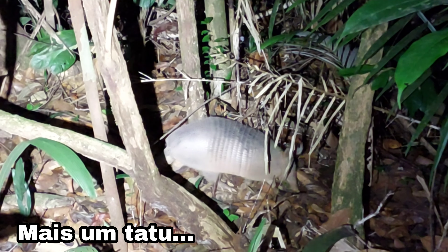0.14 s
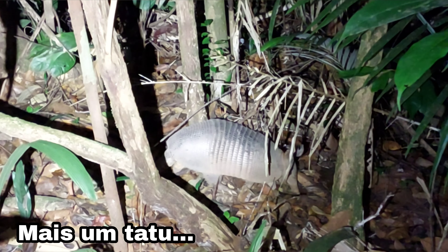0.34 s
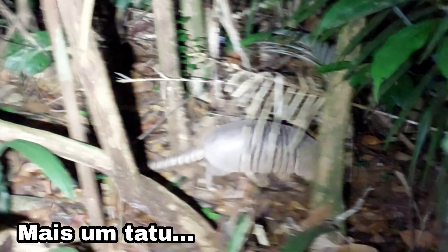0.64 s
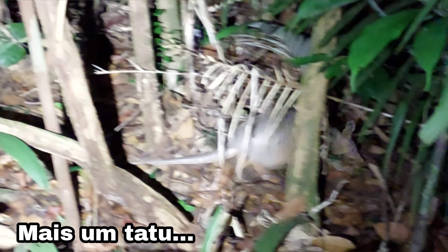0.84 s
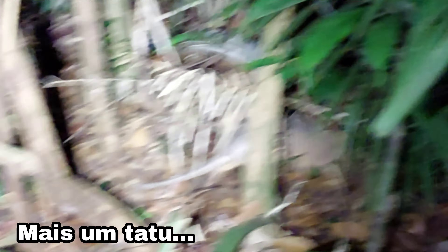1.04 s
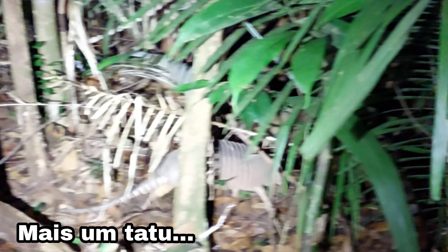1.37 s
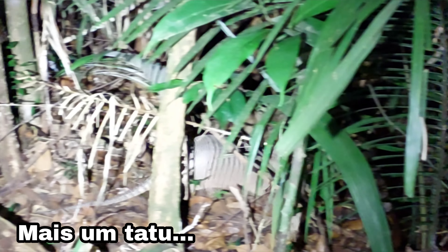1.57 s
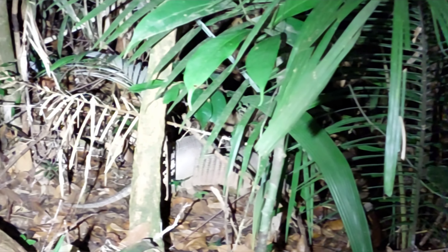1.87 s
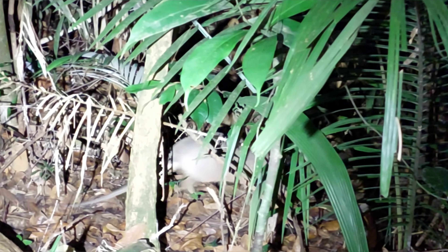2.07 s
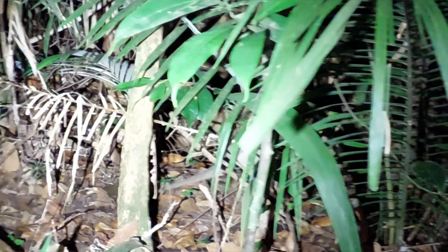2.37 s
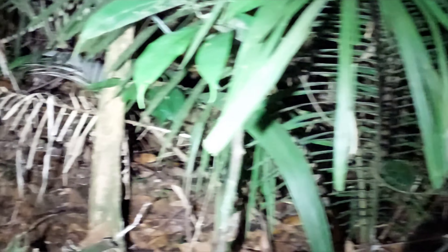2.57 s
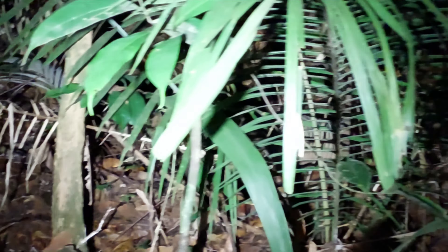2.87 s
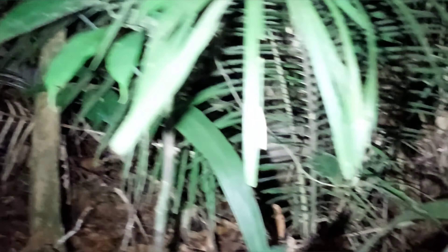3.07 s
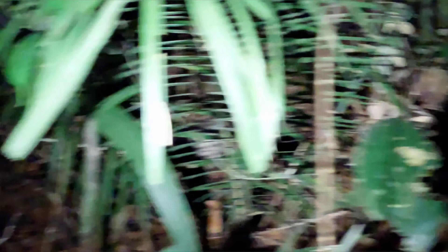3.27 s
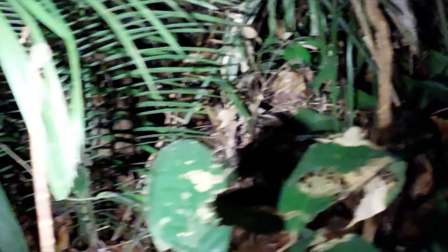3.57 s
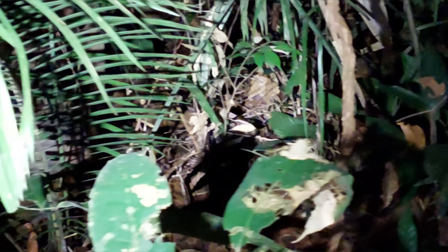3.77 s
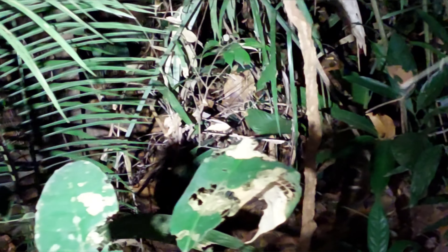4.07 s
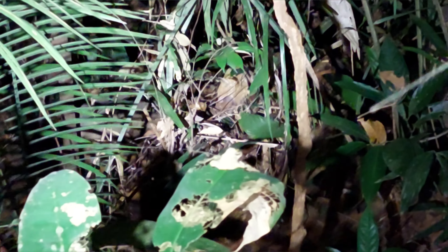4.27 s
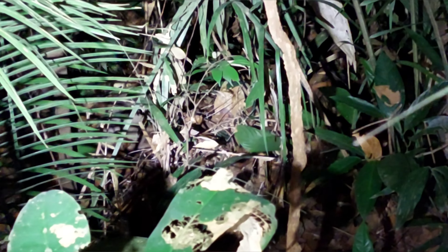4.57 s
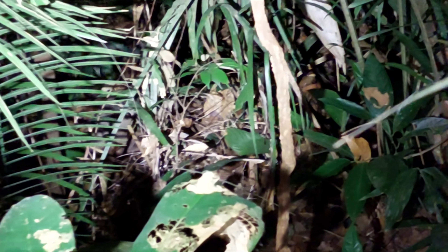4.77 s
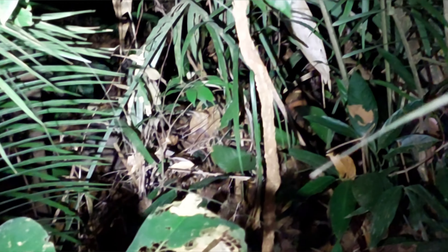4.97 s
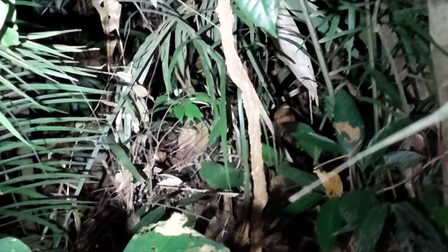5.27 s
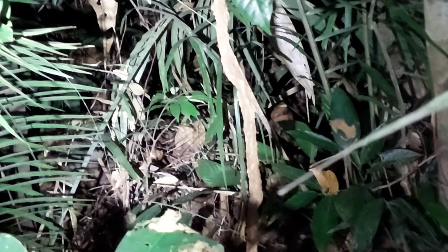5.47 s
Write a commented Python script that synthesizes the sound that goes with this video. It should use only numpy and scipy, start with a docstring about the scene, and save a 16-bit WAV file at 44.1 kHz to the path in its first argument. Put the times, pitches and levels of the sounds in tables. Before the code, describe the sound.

High pulsing insects hiss steadily over a faint low rumble as a small animal rustles through leaf litter and distant frogs call.

```python
"""Night in a rainforest, heard by a hand-held phone. From the start, far insects hiss over a low rumble and hum,
both shaped from noise or steady tones, while crickets, katydids and cicadas sing in pulsed tones and leaves
crackle in bursts of rough noise with snapping twigs. Soon a frog whoops in rising glides, again and again;
thin squeaks bend in pitch past the middle and a smaller frog answers. Then a near cricket chirps evenly in short
notes, a few pips fall away, the loudest twig snaps, and near the end a hoarse croak pulses through a throat."""
import sys
import numpy as np
from scipy import signal
from scipy.fft import rfft, irfft
from scipy.io import wavfile
from scipy.ndimage import uniform_filter1d

SR = 44100
rng = np.random.default_rng(int(sys.argv[2]) if len(sys.argv) > 2 else 0)


def wav_out(sig):
    """Save sig, one row per channel (or a flat mono array), as 16-bit PCM at SR to the path in sys.argv[1]."""
    wavfile.write(sys.argv[1], SR, np.round(np.clip(np.atleast_2d(sig).T, -1, 1) * 32767).astype(np.int16))


N = 248283
TIME = np.arange(N) / SR
SIDES = np.array([[1], [-1]])  # left, right


def undb(db):
    """Turn decibels into a plain gain."""
    return 10 ** (np.asarray(db) / 20)


def unit(x):
    """Scale a signal to an RMS level of 1."""
    return x / np.sqrt(np.mean(np.abs(x) ** 2))


def read(table, outside=None):
    """Columns of a table joined by straight lines in time."""
    s, *columns = np.transpose(table)
    return [np.interp(TIME, s, c, outside, outside) for c in columns]


def walk(rate):
    """A random wander: levels held for 1 / rate s, smoothed twice; spread near 1."""
    k = int(SR / rate)
    steps = np.repeat(rng.standard_normal(N // k + 1), k)
    smooth = uniform_filter1d(uniform_filter1d(steps, k), k)
    return unit(smooth[:N])


def over_hz(points):
    """A table of values against pitch, read at every frequency bin."""
    hz, value = np.transpose(points)
    return np.interp(np.log(np.fft.rfftfreq(N, 1 / SR) + 1), np.log(hz), value)


def phrase(start, end, db, edge_s=0.046):
    """A gain that opens and shuts softly."""
    return undb(db) * np.clip(np.minimum(TIME - start, end - TIME) / edge_s + .5, 0, 1)


# How alike noise is on the two sides: f/Hz, likeness (-1 to 1)
LIKENESS = [(60, 0.52), (130, 0.4), (500, 0.22), (1400, 0.32), (3100, 0.22), (6000, -0.033)]
# How noise leans to one side: f/Hz, left minus right level/dB
BALANCE_DB = [(100, 7), (380, 2), (4400, 0.5), (8100, 5.5), (10000, -3.5), (15000, -4)]


def stereo_noise(colour, mid=None, side=None):
    """Coloured noise on two ports, alike and tilted between them as the pitch decides; mid level 1."""
    like = np.clip(over_hz(LIKENESS), -.9, .9)
    mid = rng.standard_normal(N) if mid is None else mid
    side = rng.standard_normal(N) if side is None else side
    gain = undb(over_hz(colour))
    mid = rfft(mid) * gain * np.sqrt(1 + like)
    side = rfft(side) * gain * np.sqrt(1 - like)
    both = irfft((mid + SIDES * side) * undb(SIDES * over_hz(BALANCE_DB) / 2), N)
    return both / np.std(both.mean(axis=0))


def tone(hz, gain, pan_db, fading=0.2, spread=1.0):
    """A tone reaches the two ports by many paths, which fade and shift it differently."""
    carrier = np.sqrt(2) * np.exp(2j * np.pi * np.cumsum(hz) / SR)
    mid = unit(1 + fading * (walk(14) + 1j * walk(13)))
    side = spread * unit(walk(7) + 1j * walk(6.4))
    return gain * (carrier * (mid + SIDES * side)).real * undb(SIDES * pan_db / 2)


def forest(x, t60_s, wet_db, spread=0.82):
    """Trunks and leaves scatter a call into a short tail; spread sets how differently the ports hear it."""
    s = np.arange(SR // 2) / SR
    decay = np.exp(-np.log(1000) * s / t60_s) * (s > .008)  # the tail waits 8 ms
    mid, side = rng.standard_normal((2, len(s))) * decay
    tail = (mid + SIDES * spread * side) / np.sqrt(np.sum(mid ** 2) * (1 + spread ** 2))
    return x + undb(wet_db) * signal.fftconvolve(x, tail, axes=1)[:, :N]


def blips(events, hz, rise_s, fall_s, pan_db):
    """Short notes with a quick rise and a longer fall."""
    shape = 0
    for s, db in events:
        age = np.clip(TIME - s, 0, 1)
        shape = shape + undb(db) * (1 - np.exp(-age / rise_s)) * np.exp(-age / fall_s)
    return tone(hz + 10 * walk(60), shape, pan_db, fading=0.034, spread=0.76)


# Colour of the far insects: f/Hz, relative level/dB
CHORUS = [(2600, -35.5), (3700, -15.5), (4300, -5.5), (4640, -9), (5000, -0.5), (5400, -4), (5850, -11.5),
          (6550, 0.5), (7060, -5), (8800, -3), (9610, -17.5), (9980, -42), (10800, -20.5), (15700, -18.5)]
# Colour of the rumbling air: f/Hz, relative level/dB
AIR = [(21, -29), (35, -10), (59, -1), (83, 0), (185, -13), (274, -10.5), (393, -14.5), (466, -15.5),
       (973, -29), (2030, -28), (2550, -35.5), (3200, -15.5), (4160, -33), (7040, -120)]
# Steady low hum tones: f/Hz, level/dB
HUM = [(57, -77.5), (84, -74.5), (545, -86.5)]
CHORUS_DB, AIR_DB = -49.5, -67  # average levels


def background():
    """Countless far insects blur into a swelling hiss; below it the air rumbles and a low hum wavers."""
    chorus = stereo_noise(CHORUS) * undb(CHORUS_DB + 0.41 * walk(1.9) + 0.85 * walk(8.3))
    air = stereo_noise(AIR) * undb(AIR_DB + 1.9 * walk(8))
    hum = sum(tone(hz + 2.54 * walk(2.9), undb(db), 8.3, fading=0.16, spread=0.57) for hz, db in HUM)
    return chorus + air + hum


def crackle(spread_db):
    """Noise whose grains differ widely in size."""
    return rng.standard_normal(N) * undb(spread_db * walk(400))


# Bursts of rustling: middle t/s, length/s, low crunch level/dB, mid crackle level/dB, fine hiss level/dB
RUSTLE = [(0.082, 0.14, -76, -62, -53), (0.516, 0.058, -77, -74, -63), (0.782, 0.093, -67.5, -70, -53),
          (0.968, 0.054, -70, -65, -63), (1.05, 0.093, -71, -66.5, -58.5), (1.666, 0.17, -72, -83, -59),
          (2.275, 0.13, -85, -67.5, -56.5), (2.47, 0.23, -86, -69, -73), (2.578, 0.02, -80, -56, -73),
          (2.646, 0.015, -81, -55, -70), (2.673, 0.18, -70, -66, -59), (2.955, 0.084, -62.5, -56.5, -52.5),
          (3.706, 0.11, -67.5, -73, -62), (3.89, 0.022, -68, -80, -66.5), (4.142, 0.15, -95, -71, -59.5),
          (4.255, 0.062, -70, -59, -54.5), (4.403, 0.1, -72, -59, -58), (4.474, 0.043, -57.5, -65, -52.5),
          (4.519, 0.072, -58.5, -54.5, -52), (5.57, 0.33, -75, -82, -65)]
# Colours of the crunch, the crackle and the hiss: f/Hz, relative level/dB
LEAVES = [(150, 0), (400, 5), (640, 5.5), (850, -6.5), (1700, -1), (2600, -5), (5000, -43)]
LEAF_CRISP = [(1200, -17.5), (1900, -0.5), (3000, 2.5), (6000, -8.5)]
LEAF_TOPS = [(6000, -10), (9500, -3.5), (11500, 3), (15800, -1)]


def leaf_litter():
    """Dry leaves crackle under a small animal's feet: three colours of grainy noise swell burst by burst."""
    crunch, crisp, hiss = 0, 0, 0
    for s, length, crunch_db, crisp_db, hiss_db in RUSTLE:
        swell = 1 / (1 + (1.82 * (TIME - s) / length) ** 2) ** 1.2
        crunch = crunch + swell * undb(crunch_db)
        crisp = crisp + swell * undb(crisp_db)
        hiss = hiss + swell * undb(hiss_db)
    low = stereo_noise(LEAVES, crackle(3.8), crackle(0.84)) * crunch
    middle = stereo_noise(LEAF_CRISP, crackle(3.0), crackle(1.0)) * crisp
    high = stereo_noise(LEAF_TOPS, crackle(3.8), crackle(2.2)) * hiss
    return low + middle + high


# Twigs snapping: t/s, tick level/dB before filtering, left minus right level/dB
SNAPS = [(0.0583, -41.5, -4.5), (0.7492, -36, -8.5), (0.7734, -36.5, -5.0), (0.8002, -31, -5.5),
         (0.9373, -37, -8), (1.625, -38.5, -8), (2.971, -37, 0), (3.5214, -41.5, -9), (3.7783, -39.5, -14),
         (4.0095, -35, -9), (4.413, -24.5, -5.0), (4.909, -33.5, -14)]
TWIG_BODY_DB = -56  # the duller part of each snap, before filtering


def twigs():
    """A snapping twig gives a very short bright tick and a slightly longer, duller knock."""
    ticks, bodies = np.zeros((2, N)), np.zeros((2, N))
    age = np.arange(600) / SR
    for (s, tick_db, pan_db), burst in zip(SNAPS, rng.standard_normal((len(SNAPS), 600))):
        at = slice(int(s * SR), int(s * SR) + 600)
        ticks[:, at] += undb(tick_db + SIDES * pan_db / 2) * burst * np.exp(-age / 0.00048)
        bodies[:, at] += undb(TWIG_BODY_DB) * burst * np.exp(-age / 0.0013)
    ticks = signal.sosfilt(signal.butter(2, 7000, "high", fs=SR, output="sos"), ticks)
    bodies = signal.sosfilt(signal.butter(1, (800, 4000), "band", fs=SR, output="sos"), bodies)
    return forest(ticks + bodies, 0.083, 1.5)


# Thin high squeaks: t/s, length/s, start f/Hz, middle f/Hz, end f/Hz, level/dB
SQUEAKS = [(2.77, .07, 13700, 14100, 13700, -65), (2.845, 0.068, 12600, 12300, 12700, -65),
           (3.211, .19, 13400, 14300, 13900, -74), (3.43, .07, 12600, 12500, 12200, -75),
           (5.362, .11, 13400, 14100, 13400, -68)]


def squeaks():
    """Each squeak bends through three pitches along a parabola."""
    hz, gain = 0, 0
    for s, length, from_hz, middle_hz, to_hz, db in SQUEAKS:
        u = 2 * np.clip((TIME - s) / length, 0, 1) - 1  # -1 at the start, 1 at the end
        arch = middle_hz + u * (to_hz - from_hz) / 2 + u ** 2 * ((from_hz + to_hz) / 2 - middle_hz)
        hz = np.where(TIME > s - .01, arch, hz)
        gain = gain + phrase(s, s + length, db, .02)
    return tone(hz, gain, -9)


def whooper(calls, length_s, from_hz, to_hz):
    """One frog repeats a call that glides up, fast at first, and weakens as it goes."""
    done, gain = 0, 0
    for s, db in calls:
        done = np.where(TIME > s - .03, np.clip((TIME - s) / length_s, 0, 1), done)
        gain = gain + phrase(s, s + length_s, db, 0.029)
    hz = from_hz + (to_hz - from_hz) * np.sin(done * np.pi / 2) + 22 * walk(110)
    return tone(hz, gain * undb(-6 * done), 1.0, fading=0.085, spread=0.29)


# A frog's whoops: t/s, level/dB at the start of the call
WHOOPS = [(0.444, -62), (1.345, -60.5), (2.515, -60), (3.494, -59), (4.364, -57), (5.344, -58.5)]
# A smaller frog's answers: t/s, level/dB at the start of the call
ANSWERS = [(3.14, -63), (3.931, -68), (4.951, -67.5)]


def whoops():
    """A whooping frog and a smaller one that answers, both smeared by the trees."""
    caller = whooper(WHOOPS, length_s=.105, from_hz=410, to_hz=520)
    answerer = whooper(ANSWERS, length_s=.045, from_hz=432, to_hz=465)
    return forest(caller + answerer, 0.9, 0.36, 0.21)


# Throat resonances: f/Hz, width/Hz of each of two passes, level/dB
THROAT = [(886, 310, -9.5), (2075, 360, 2.5), (3460, 270, 9)]
CROAK_START_S, CROAK_LENGTH_S = 5.145, .12
CROAK_RATE_HZ, CROAK_SAG_HZ_PER_S = 239.5, 40.5  # pulse rate at the start, and how fast it sinks
CROAK_DB, CROAK_FALL_DB_PER_S = -56, 53


def croak():
    """Uneven pulses and a little breath noise ring the throat's resonances, making a hoarse croak."""
    age = np.clip(TIME - CROAK_START_S, 0, CROAK_LENGTH_S)
    rate = (CROAK_RATE_HZ - CROAK_SAG_HZ_PER_S * age) * (1 + .009 * walk(70))
    pulses = np.diff(np.floor(np.cumsum(rate) / SR), prepend=0) > 0  # one click per cycle
    buzz = pulses * undb(4.4 * walk(150)) + 0.057 * rng.standard_normal(N)
    voice = 0
    for f, width, gain_db in THROAT:
        b, a = signal.iirpeak(f, f / width, SR)
        ringing = signal.lfilter(b, a, signal.lfilter(b, a, buzz))
        voice = voice + undb(gain_db) * unit(ringing)
    level_db = CROAK_DB - CROAK_FALL_DB_PER_S * age
    gain = phrase(CROAK_START_S, CROAK_START_S + CROAK_LENGTH_S, level_db, 0.026)
    return forest(unit(voice) * gain * np.ones((2, 1)), 0.98, -0.93)


PIP_S, PIP_GAP_S = 3.9639, .0275  # first pip, time between pips
PIP_DB, PIP_LOSS_DB = -40, 16  # first pip before its rise and fall, loss from pip to pip


def pips():
    """A frog's three quick pips on one pitch, each much weaker than the last."""
    events = [(PIP_S + k * PIP_GAP_S, PIP_DB - k * PIP_LOSS_DB) for k in range(3)]
    return forest(blips(events, 3640, rise_s=0.0019, fall_s=0.01, pan_db=1), 0.23, -2)


# Three cicadas, one list each: t/s, click rate f/Hz, level/dB before the body, brightness/dB per multiple
CICADAS = [
    [(1.3, 404.3, -67, -7.5), (2.4, 402.3, -57.5, 11), (3.07, 397.7, -57.5, -1.5), (3.4, 396.2, -54.5, 6),
     (3.45, 398, -52.5, -5), (3.7, 396, -51, 0.5), (4.0, 395.6, -57, 4), (4.45, 391.7, -49.5, 6),
     (4.75, 392, -55.5, 2.5), (5.1, 389.9, -54.5, -3.5), (5.63, 385.3, -52, 0.5)],
    [(0.55, 409.5, -64.5, -1), (1.75, 400.6, -64.5, 7), (2.2, 407, -93, 2)],
    [(0, 383.6, -68.5, -1), (2.2, 369.5, -68.5, -1.8), (4.4, 372.4, -70.5, -9)],
]
# Multiples of the click rate that the body lets through
MULTIPLES = [10, 11, 12]
# How strongly each multiple comes out: level/dB
BODY_DB = [-3.5, -0.5, -9.5]
PARTIAL_FLICKER_DB = 2


def cicada(song):
    """Even clicks through a ringing body: only a few multiples of the click rate come out, flickering alone."""
    hz, _, tilt_db = read(song)
    db = read(song, -120)[1]  # silent outside its song
    out = 0
    for k, body_db in zip(MULTIPLES, BODY_DB):
        level_db = db + body_db + tilt_db * (k - MULTIPLES[1]) + PARTIAL_FLICKER_DB * walk(18)
        out = out + tone(k * hz, undb(level_db), 0.85, fading=0.54)
    return out


# Pitch of each cricket or katydid tone: f/Hz
PITCH_HZ = [4865, 5045, 5170, 5450, 6540, 6620, 6330, 6989, 7016, 9400, 8680, 13800, 14200, 10700, 11900,
            5200, 7549, 7627, 7927]
# Their songs: pulse rate/Hz, t/s of one pulse, pulse sharpness, pitch wander/Hz, left minus right level/dB,
# swell/dB per s within a phrase. The last three rows are the tones of one katydid that buzzes in bursts.
SINGERS = [(13.9, 0.023, 0.65, 4, -5.5, -0.1), (41, 0.0076, 0.062, 3.4, 2, 1.8),
           (19.2, 1.425, 1.64, 6, -3, 1.5), (61.2, 0.7048, 1.1, 70, -2, -2),
           (27.06, 0.6223, 0.93, 10, 4.5, 3.5), (35.06, 0.015, 0.65, 13, 7.5, 0),
           (26.6, 0.011, 0.78, 22, 8, 2), (26.9, 0.52, .3, 1.3, 0, -1), (26.8, 1.2, 0.26, 2, -3, 3),
           (18.1, 1.1, 1.3, 25, 1, 6), (32.8, 0.01, 0.34, 110, 4.5, 0.35), (170, 0.01, 0.34, 150, -4.5, -1),
           (187, 0.0087, 0.46, 240, -5, -2), (134, 0.0056, 0.18, 290, 8, -12),
           (103, 0.01, 0.32, 97, -12, -4), (55.9, 0.013, 0.24, 110, 14, 0.5),
           (127.2, 0.01, 0.39, 4, 0.5, -2), (133, 0.0113, 2.5, 6.2, 2, 7), (131.4, 0.01, 1.2, 3.2, 4.5, -6)]
# Phrases of one cricket whose two close tones beat against each other: start t/s, end t/s, level/dB at the
# middle
PAIR = [(-1, 0.22, -62), (1.446, 2.745, -62.5), (4.25, 5.45, -61.5)]
# Phrases of all but the last three, singer by singer: start t/s, end t/s, level/dB at the middle
PHRASES = [
    [(-0.56, 8, -62)],
    [(1.8, 6, -61.5)],
    [(-0.77, 2.95, -62)],
    [(0.65, 2.2, -60), (2.9, 3.8, -55.5)],
    [(0.6, 1.38, -54.5), (1.4, 3.1, -55), (3.65, 5.0, -55.5)],
    [(0, 4.4, -61), (4.5, 6.5, -60)],
    [(3.4, 4.5, -66)],
    PAIR,
    PAIR,
    [(0.85, 1.5, -64), (2.15, 2.4, -64), (3.03, 3.45, -67)],
    [(-0.35, 6, -59.5)],
    [(0, 0.32, -59.5), (4.95, 5.33, -59.5)],
    [(0.5, 0.75, -67), (1.2, 1.5, -68), (4.8, 5.0, -64)],
    [(0.85, 1.25, -68), (2.4, 2.75, -73)],
    [(0.848, 1.05, -62.5)],
    [(-1.6, 9.2, -67.5)],
]
# Bursts of the buzzing katydid: middle t/s, level/dB before each tone's share
BUZZ = [(0.08, -54.5), (0.68, -59), (1.32, -56), (1.96, -56), (2.538, -55.5), (3.12, -58), (3.7, -53),
        (4.28, -56.5), (4.88, -57.5), (5.66, -55)]
# Share of each of its three tones: level/dB
BUZZ_TONES_DB = [1.5, -0.2, -7.5]
BUZZ_S = 0.22  # length of a burst


def singers():
    """Wing files ring one pitch in bell-shaped pulses; some swell or fade through each phrase."""
    phrases = list(PHRASES)
    for share_db in BUZZ_TONES_DB:
        phrases.append([(s - BUZZ_S / 2, s + BUZZ_S / 2, db + share_db) for s, db in BUZZ])
    out = 0
    for hz, (rate, first, sharp, wander_hz, pan_db, swell), rows in zip(PITCH_HZ, SINGERS, phrases):
        song = 0
        for start, end, db in rows:
            from_middle = np.clip(TIME, start, end) - (start + end) / 2
            song = song + phrase(start, end, db + swell * from_middle, 0.15)
        pulses = unit(np.exp(sharp * np.cos(2 * np.pi * rate * (TIME - first))))
        out = out + tone(hz + wander_hz * walk(20 + 4 * wander_hz), pulses * song, pan_db)
    return forest(out, 0.33, -3.0)


CHIRP_S, CHIRP_GAP_S = 3.7666, .05747  # first chirp, time between chirps
CHIRP_DB, CHIRP_START_DB = -38, -6  # usual level before rise and fall; the first chirp starts this far below
CHIRP_WARM_UP = 2  # chirps it takes to catch up most of the way
SECOND_STROKE_S, SECOND_STROKE_DB = .021, -12  # delay and level against the first stroke


def near_cricket():
    """A near cricket chirps evenly; each chirp is a short ringing note and a weaker second stroke."""
    chirps = []
    for k in range(33):
        warm_up_db = CHIRP_START_DB * np.exp(-k / CHIRP_WARM_UP)
        chirps.append((CHIRP_S + k * CHIRP_GAP_S, CHIRP_DB + warm_up_db + rng.standard_normal()))
    chirps += [(s + SECOND_STROKE_S, db + SECOND_STROKE_DB) for s, db in chirps]
    return forest(blips(chirps, 5375, rise_s=.0025, fall_s=.008, pan_db=.5), .12, -11)


def scene():
    """All the night's sounds together, from the background to the insects."""
    animals = leaf_litter() + twigs() + squeaks()
    frogs = whoops() + croak() + pips()
    insects = sum(cicada(song) for song in CICADAS) + singers() + near_cricket()
    return background() + animals + frogs + insects


TOP_HZ = 15800  # highest pitch that gets through


def record(dry):
    """The phone cuts the top with a very steep filter."""
    return signal.sosfilt(signal.ellip(12, .5, 90, TOP_HZ, fs=SR, output="sos"), dry)


dry = scene()
out = record(dry)
wav_out(out)
```